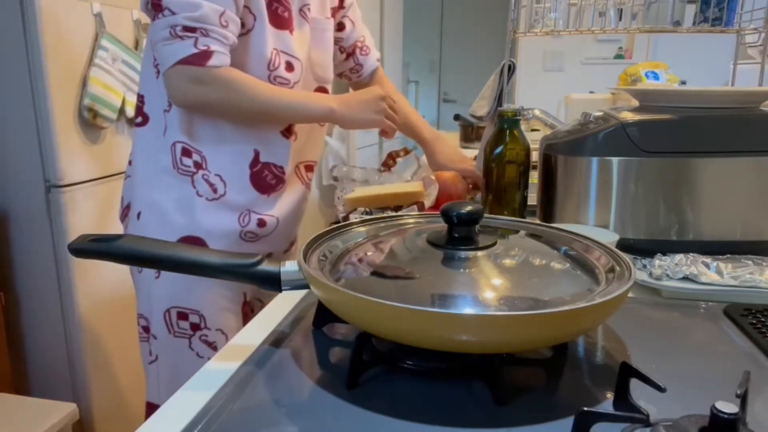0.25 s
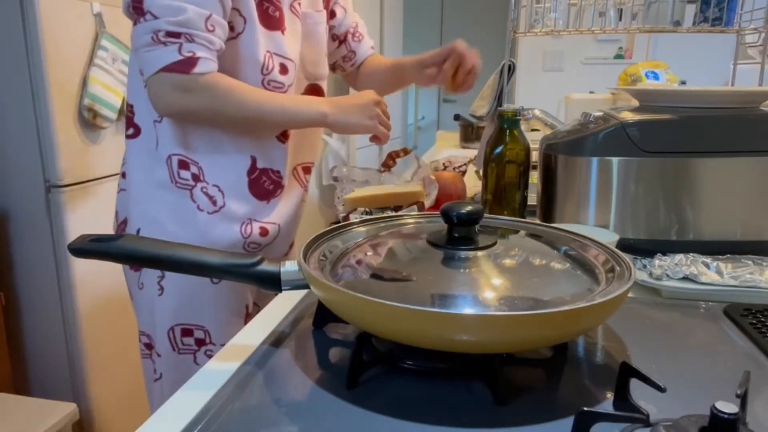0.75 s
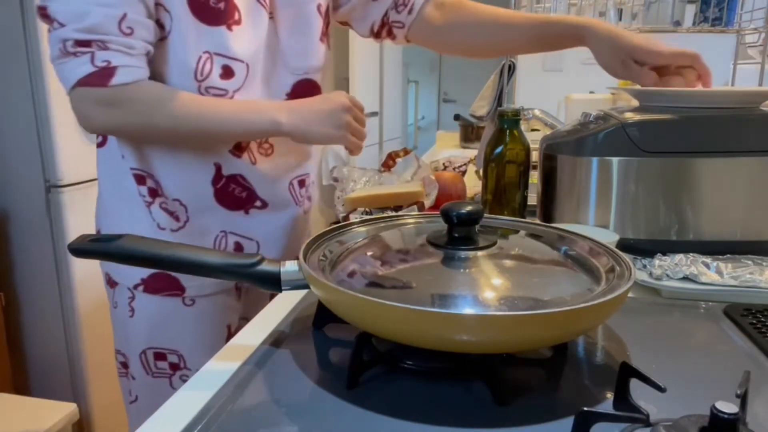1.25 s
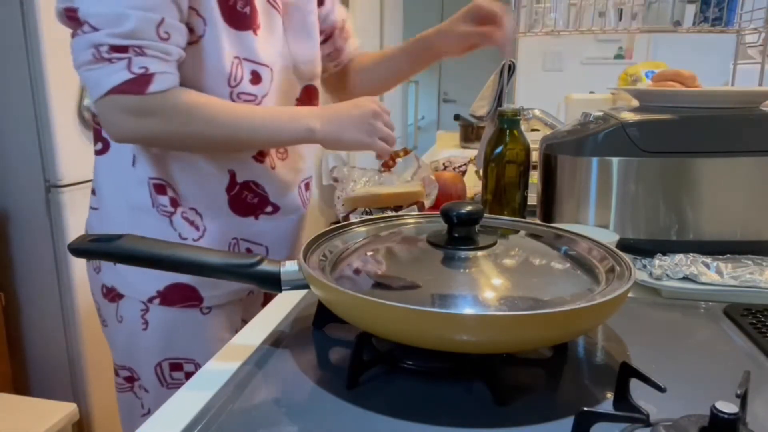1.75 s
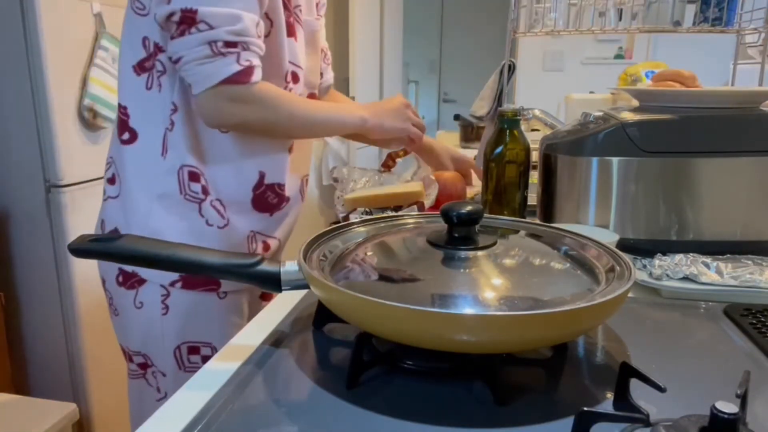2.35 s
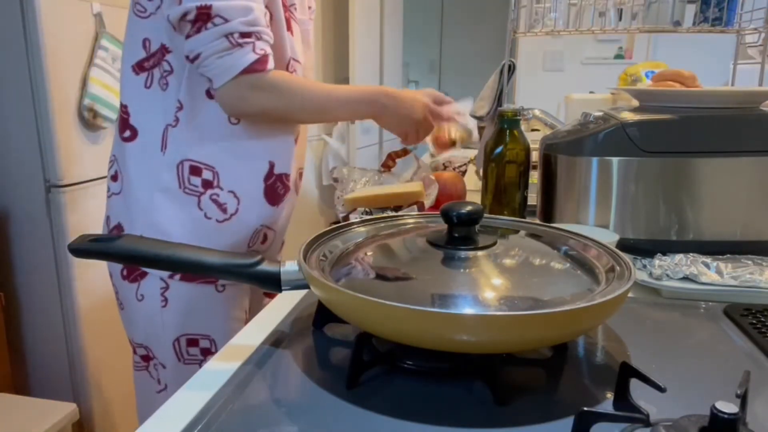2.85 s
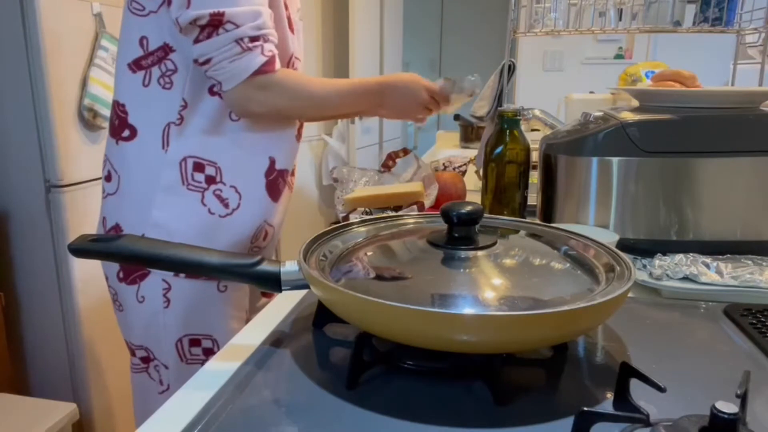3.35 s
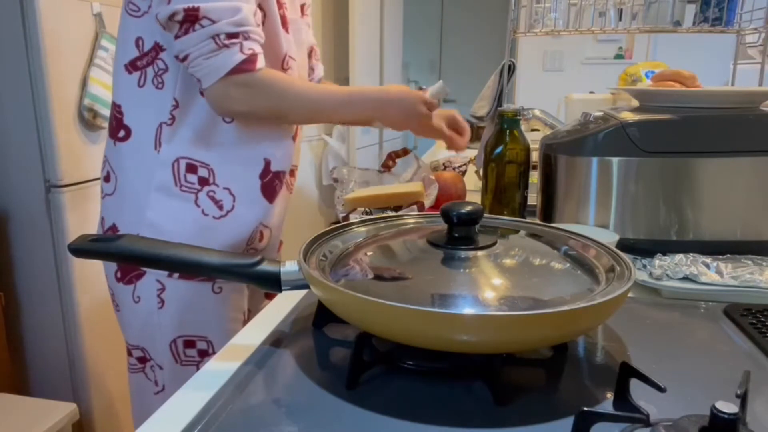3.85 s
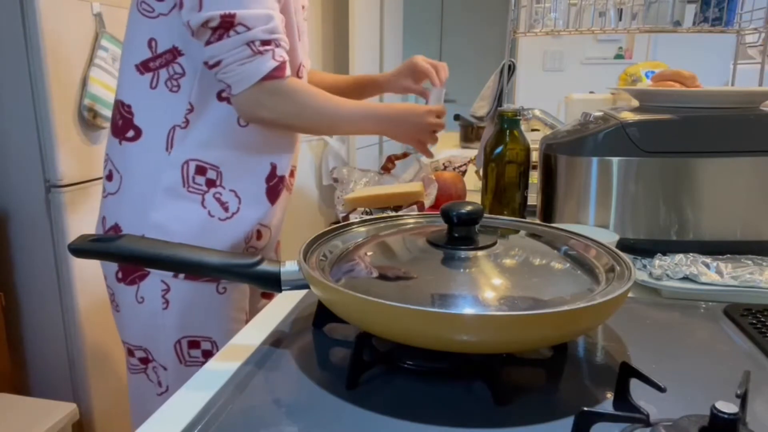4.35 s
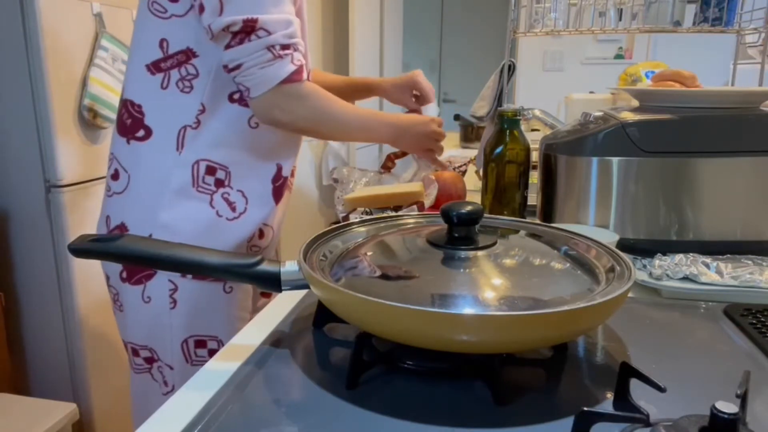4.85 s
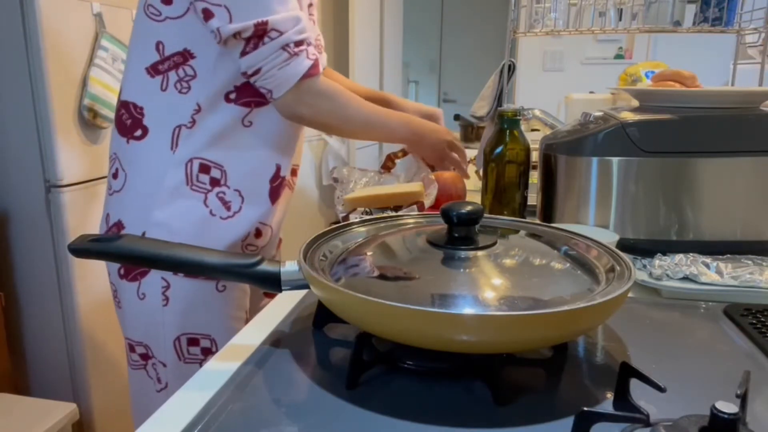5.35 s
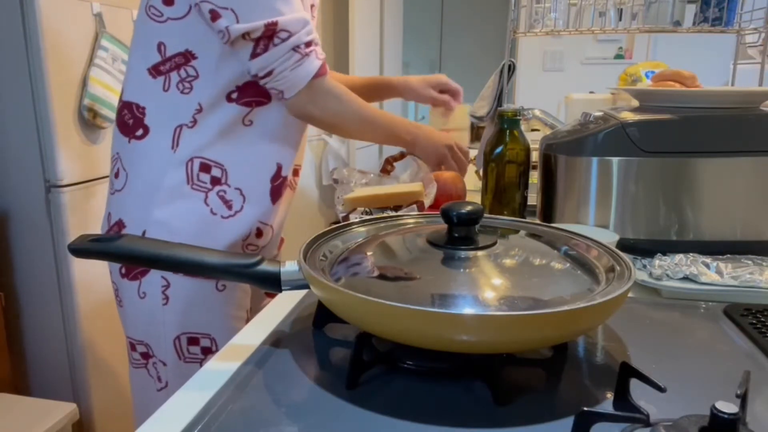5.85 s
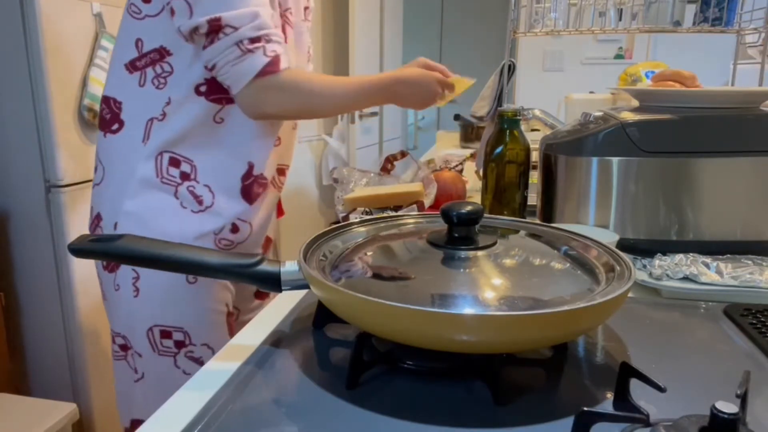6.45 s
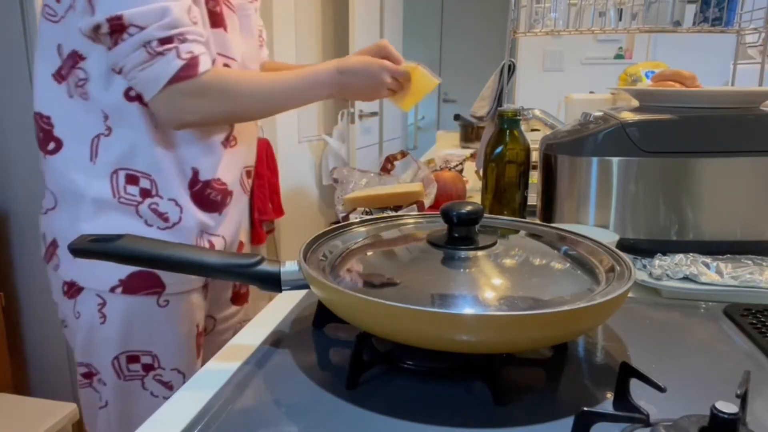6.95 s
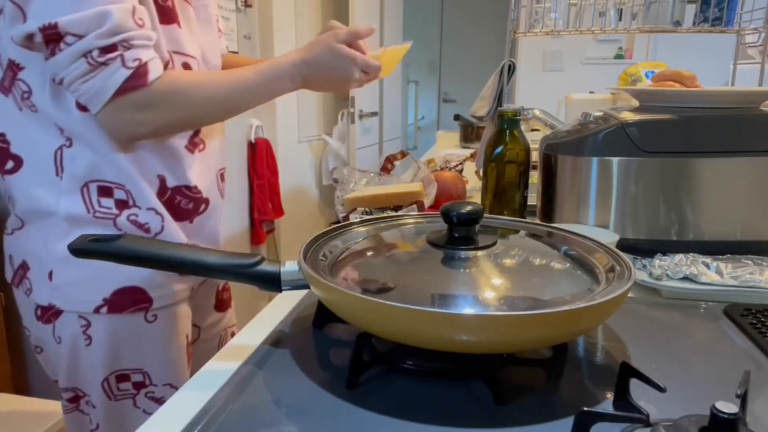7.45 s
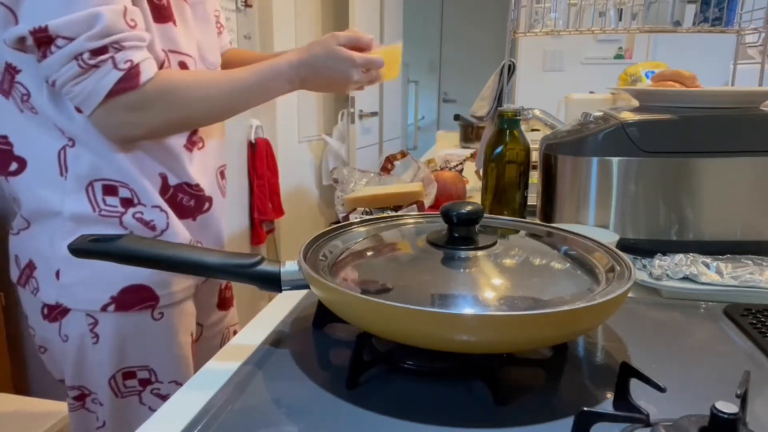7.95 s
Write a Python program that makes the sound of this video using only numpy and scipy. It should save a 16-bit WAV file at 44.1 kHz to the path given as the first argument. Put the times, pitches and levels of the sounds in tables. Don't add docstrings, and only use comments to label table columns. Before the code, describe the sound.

A low extractor hum and thin gas hiss sit behind everything. Fat ticks faintly against a pan lid, then thin plastic packaging crackles brightly at arm's length, densest early on, looser while folded. A low bump follows, then a lull with livelier simmering and one brief crinkle, before a last vigorous peel. Short, dry room reflections; wooden floor groans under shifting weight.

```python
import sys
import numpy as np
from scipy import signal
from scipy.fft import rfft, irfft, next_fast_len
from scipy.io import wavfile
from scipy.ndimage import uniform_filter1d

SR = 44100
rng = np.random.default_rng(int(sys.argv[2]) if len(sys.argv) > 2 else 0)


def nominal_scale(level):
    x = np.asarray(level, float) / 20
    return 10 ** x


def store_wav(level_fs):
    pcm = np.round(np.clip(np.atleast_2d(level_fs), -1, 1) * 32767)
    wavfile.write(sys.argv[1], SR, pcm.T.astype(np.int16))


N = 361619


def rms_one(x):
    return x / np.sqrt(np.mean(x ** 2) + 1e-20)


def at_hz(points, hz):
    points = np.array(points)
    return np.interp(np.log(hz), np.log(points[:, 0]), points[:, 1])


def drift(rate_hz):
    r = np.exp(-2 * np.pi * rate_hz * 40 / SR)
    white = rng.standard_normal(N // 40 + 2002)
    slow = rms_one(signal.lfilter([1], [1, -2 * r, r * r], white)[2000:])
    return np.interp(np.arange(N) / 40, np.arange(len(slow)), slow)


def swell(s, db, rise_s, fall_s):
    t = np.arange(N) / SR - s
    away = np.where(t < 0, -t / rise_s, t / fall_s)
    return nominal_scale(db - 20 * np.minimum(away, 8))


def band(x, low_hz, high_hz):
    edges = [low_hz, min(high_hz, .45 * SR)]
    return signal.sosfilt(signal.butter(2, edges, "band", fs=SR, output="sos"), x)


def resonate(x, hz, width_hz):
    r = np.exp(-np.pi * width_hz / SR)
    poles = [1, -2 * r * np.cos(2 * np.pi * hz / SR), r * r]
    return signal.lfilter(np.array([1, 0, -1]) * (1 - r * r) / 2, poles, x)


def resonate_twice(x, hz, width_hz):
    return resonate(resonate(x, hz, width_hz), hz, width_hz)


# pitch in Hz, left-right likeness (-1 to 1)
LIKENESS = [(50, 1), (130, 0.92), (200, 1), (300, 0.038), (640, -0.79), (1300, 0.75), (2500, 0.75),
            (5000, -0.063)]
# pitch in Hz, left over right in dB
BALANCE = [(50, -1), (130, -3), (300, 3), (600, 8.5), (1200, -0.5)]


def paired(hz):
    mid, side = rng.standard_normal((2, N))
    alike = np.clip(at_hz(LIKENESS, hz), -1, 1)
    lean = nominal_scale(at_hz(BALANCE, hz) / 2 * np.array([[1], [-1]]))
    return lean * (np.sqrt(1 + alike) * mid + np.sqrt(1 - alike) * side * [[1], [-1]]) / np.sqrt(2)


def coloured(source, spectrum, patchy_db, rate_hz):
    low_end, high_end = spectrum[0][0], spectrum[-1][0]
    edges = np.geomspace(low_end, high_end, round(3 * np.log2(high_end / low_end)))
    out = 0
    for low, high in zip(edges, edges[1:]):
        hz = np.sqrt(low * high)
        gain = nominal_scale(at_hz(spectrum, hz) + patchy_db * drift(rate_hz))
        out = out + gain * band(source(hz), low, high)
    return rms_one(out)


def grains(per_s, spread_db, wander=0):
    at = np.flatnonzero(rng.random(N) < per_s / SR)
    size, sign, place = rng.random((3, N // 4))[:, :len(at)]
    clicks = nominal_scale(spread_db * np.minimum(-np.log(size), 3.2)) * np.sign(sign - .5)
    out = np.full((2, N), 1e-18)
    out[0, at] = clicks
    shift = (wander * (2 * place - 1)).astype(int)
    out[1, np.clip(at + shift, 0, N - 1)] = clicks
    return out if wander else out[0]


def add(out, s, sound, pan_db, lag=0):
    start = round(s * SR)
    for side, at in enumerate((start, start + lag)):
        out[side, at:at + len(sound)] += sound[:N - at] * nominal_scale(pan_db * (.5 - side))


FILM_WANDER = 11
# start in seconds, peak in dB, ring in Hz,
# brightness in dB
CREASES = [(2.0572, -34, 2600, -13), (2.123, -40.5, 2250, -16), (2.2214, -35.5, 1010, -28),
           (2.2525, -29, 1710, -31), (2.3093, -31.5, 1850, -44), (2.3465, -33, 2700, -21),
           (2.3535, -16, 2400, -23), (2.3568, -21, 1610, -10), (2.3945, -20.5, 1000, -28),
           (2.4025, -20.5, 1570, -8), (2.4462, -27, 2270, -30), (2.4785, -28, 1220, -30),
           (2.529, -33, 1880, -56), (2.659, -36.5, 2520, -48), (2.732, -21.5, 5850, -1),
           (2.828, -33.5, 1320, -36), (2.8518, -22, 2500, -0.5), (2.8565, -21, 2200, 1),
           (2.967, -27, 2500, -4), (2.9566, -35, 1710, -14), (2.9758, -38, 1180, -9),
           (3.093, -34, 4300, -16), (3.1063, -17, 4200, -10), (3.1125, -30, 4020, -3),
           (3.1368, -20, 5240, -19), (3.1409, -18.5, 5040, -2), (3.225, -34, 4530, 1),
           (3.2345, -24.5, 6000, -7), (3.2448, -18, 4060, 0), (3.2886, -23, 2820, -26),
           (3.2952, -27.5, 1390, -27), (3.299, -22, 2800, -29), (3.3045, -23.5, 3240, -22),
           (3.3735, -26.5, 2970, -16), (3.387, -25.5, 1610, -8), (3.3955, -24, 3900, 4),
           (3.4108, -22.5, 1330, -28), (3.414, -19.5, 3180, -5), (3.424, -29, 3050, -12),
           (3.5685, -33, 2010, -3.5), (3.703, -35, 1970, -51),
           (4.1769, -40.5, 2200, -31), (4.3067, -25.5, 2880, -27), (4.318, -26, 1970, -0.5),
           (4.324, -32.5, 2600, -1), (4.331, -45, 2200, -18), (4.38, -33, 2000, -10),
           (4.42, -36, 2580, -40), (4.626, -30.5, 2600, -6), (4.686, -31.5, 2640, -6),
           (4.715, -35, 3900, -32), (4.6615, -36, 2270, -28), (4.77, -32, 2770, -13),
           (4.7765, -29.5, 2040, -7), (4.818, -24, 2430, -7.5), (4.825, -24.5, 5400, -20),
           (4.9193, -29.5, 1870, -2), (4.995, -43.5, 1090, -37), (5.071, -37.5, 935, -40),
           (5.182, -26.5, 1390, -43), (5.307, -36.5, 1130, -39), (5.53, -32, 3740, -38),
           (5.552, -35.5, 1090, -43), (5.668, -34.5, 1200, -33), (5.7878, -30.5, 1230, 1),
           (5.8057, -28, 1180, -20), (5.826, -40, 1500, -25), (5.869, -35, 1730, -35),
           (5.907, -35.5, 1420, -29), (5.955, -38, 1280, -26), (5.848, -32, 1110, -44),
           (5.8872, -38, 1040, -49), (5.9275, -34.5, 1030, -38),
           (6.133, -43, 5500, 13), (6.356, -44, 1980, -19), (6.81, -44, 6000, 14), (6.845, -46, 6000, 10),
           (7.083, -43, 5500, 8), (7.811, -34.5, 3500, 2), (7.173, -41, 3730, -31), (7.19, -29, 2440, -4),
           (7.208, -22, 2300, 2), (7.7778, -26.5, 1810, 0), (7.786, -27.5, 4330, -3),
           (7.848, -33, 4500, 10), (7.894, -33, 2800, 3), (7.978, -39, 3120, -8), (7.9914, -24, 2930, -4),
           (8.013, -22, 2600, -25), (8.0178, -17, 2100, -3), (8.021, -17.5, 2000, -10.5),
           (8.023, -34, 2200, -6), (8.031, -32, 1900, -20), (8.048, -31, 2400, -30),
           (8.053, -24, 2490, -30), (8.075, -17, 2480, 1), (8.0787, -15, 2380, 3), (8.085, -30, 2600, 7),
           (8.091, -21, 2410, -14), (8.099, -18, 2340, -23), (8.115, -15.5, 2050, -19),
           (8.133, -34, 2780, -18), (8.16, -25, 2200, -18), (8.18, -35, 2200, -9),
           (4.742, -41, 980, -25), (5.191, -30.5, 2170, -23), (5.204, -36, 2600, -25),
          (5.279, -41.5, 1200, -36), (5.467, -39, 1080, -30), (5.655, -40, 1300, -22),
          (5.69, -53, 1300, -20), (5.71, -48, 1500, -18), (5.773, -39.5, 1100, -10),
          (5.878, -37, 1180, -32), (5.94, -52, 1500, -20), (5.975, -43, 2470, -22), (7.792, -33.5, 2200, 2),
          (1.178, -47, 686, -45), (0.428, -41, 3500, -18), (1.268, -50, 3200, -25), (1.523, -47, 3500, -22),
          (2.369, -32, 2800, -15), (2.415, -35, 2200, -20), (2.428, -35, 3430, -20),
          (2.328, -35.5, 1040, -40), (2.468, -39, 1050, -37), (2.733, -35.5, 1190, -28),
          (3.109, -38, 1800, -25), (3.2, -56, 1350, -35), (3.584, -35, 6500, -9), (3.645, -50, 1100, -35),
          (3.741, -41.5, 2960, -18), (3.942, -57.5, 3300, -40), (3.997, -40, 4470, -42),
          (4.109, -49.5, 5000, -14), (4.165, -42, 7000, -8), (4.3088, -33.5, 1070, -35),
          (4.651, -39, 2300, -25), (4.716, -39.5, 1150, -35), (4.781, -27, 6030, -10),
          (4.918, -40.5, 1170, -30), (7.986, -40.5, 1020, -40), (8.079, -39, 535, -50),
          (8.114, -31, 530, -50), (8.176, -33, 1000, -40)]


def snaps():
    out, t = np.zeros((2, N)), np.arange(2600) / SR
    rows = CREASES
    fade = np.minimum(t / 0.0005, 1) * (np.exp(-t / 0.0018) + 0.25 * np.exp(-t / 0.008))
    for (s, db, hz, bright_db), (noise, dice) in zip(rows, rng.standard_normal((len(rows), 2, 2600))):
        rattle = noise * nominal_scale(4.36 * dice) * fade
        clatter = 0.91 * rms_one(band(rattle, 0.62 * hz, 2.4 * hz))
        ring = 4.7 * rms_one(resonate(resonate(rattle, hz, 0.3 * hz), hz, 1.14 * hz))
        front = nominal_scale(1.11 * (bright_db + 18.5)) * rms_one(band(rattle, 2630, 13600))
        sound = clatter + ring + front
        pan_db = 6.5 * np.tanh(dice[-1]) - 0.5
        lag = int(FILM_WANDER * np.tanh(dice[-2]))
        add(out, s, nominal_scale(db + 1.5) * sound / np.abs(sound).max(), pan_db, lag)
    return out


# peak time in seconds, peak in dB, fall in seconds, brightness in dB, low body in dB
TUGS = [(2.06, -34, 0.026, 0.5, -11), (2.358, -35, 0.11, -2, -10), (2.971, -32.5, 0.055, -6, -8),
        (3.109, -35.5, 0.16, -11, -9.5), (3.377, -28, 0.097, -6, -12), (4.178, -46.5, 0.19, -16, -10),
        (4.315, -41.5, 0.23, -11, -3.5), (4.632, -38.5, 0.022, -26, -9.5), (4.825, -37.5, 0.016, 1, -19),
        (5.18, -49, 0.14, -40, -28), (5.8, -48, 0.51, -30, -8), (6.791, -53.5, 0.13, 4.5, -9),
        (7.344, -62, 0.18, -16, -16), (7.417, -55, 0.13, -4, 0), (7.77, -59, 0.22, 13.5, -1),
        (8.017, -28.5, 0.088, -3, -21), (8.075, -32, 0.072, 3, -5.5), (8.15, -39, 0.26, 2, 2.5)]
# peak time in seconds, peak in dB, rise in seconds, fall in seconds, brightness in dB
SQUEEZES = [(2.3, -47, 0.46, 0.33, -31), (2.411, -34.5, 0.11, 0.12, -8.5), (2.694, -52, 0.3, 0.064, -37),
            (2.852, -46, 0.068, 0.4, -10), (3.302, -28, 0.073, 0.046, -4.5), (3.411, -30, 0.1, 0.047, -7.5),
            (3.77, -62, 0.22, 0.059, -26), (4.1, -58, 0.033, 0.036, -9), (4.48, -64, 0.32, 0.053, -27),
            (4.72, -45.5, 0.1, 0.37, -26), (5.05, -47.5, 0.069, 0.063, -21),
            (5.71, -51.5, 0.53, 0.05, -1.5), (5.95, -46, 0.42, 0.022, -32), (7.207, -45.5, 0.021, 0.11, 3),
            (7.95, -60, 0.91, .1, -12), (8.12, -33, 0.17, 0.23, 1)]
# pitch in Hz, density in dB per Hz
FILM_COLOUR = [(700, -14), (1100, 0), (1700, 0.5), (2600, 5), (4000, 0), (6500, -4), (8500, -6)]


def crumple():
    tug_rise_s, squeeze_body_db = 0.0069, -7
    moves = [(s, db, tug_rise_s, *rest) for s, db, *rest in TUGS]
    moves += [(*row, squeeze_body_db) for row in SQUEEZES]
    power = uniform_filter1d([swell(*move[:4]) ** 2 for move in moves], size=300)
    bright_db, body_db = np.transpose(moves)[4:]
    level = np.sqrt(power.sum(axis=0))
    bright = np.sqrt(nominal_scale(2 * bright_db) @ power)
    low = np.sqrt(nominal_scale(2 * body_db) @ power)

    clumps = nominal_scale(5.5 * drift(70.0))
    clicks = rms_one(grains(1800 * clumps, 4.0, FILM_WANDER))

    def creases(hz):
        return clicks + 0.53 * rms_one(grains(450.0 * clumps, 7.2, FILM_WANDER))

    mid = coloured(creases, FILM_COLOUR, patchy_db=2.5, rate_hz=24)
    top = nominal_scale(-1.0) * rms_one(band(clicks, 3500, 11900))
    body = nominal_scale(-5.0) * rms_one(band(band(clicks, 206, 900), 250, 1130))
    return level * mid + bright * top + low * body


# start in seconds, peak in dB, ring in Hz, left over right in dB
SPITS = [(0.082, -58, 3060, 5), (0.192, -53.5, 5610, 0), (0.604, -59, 3730, 0), (0.696, -60, 1140, 2),
         (0.997, -64, 2420, 0), (1.165, -52, 2150, -5), (1.23, -56, 4570, 5), (1.321, -52, 6200, 2),
         (1.3316, -49.5, 1040, -1), (1.362, -52, 4630, 0), (1.888, -59, 1540, 0), (1.908, -59, 1820, -6),
         (2.002, -58, 3100, -6), (0.134, -54.5, 870, 11), (0.313, -49.5, 880, 2), (0.414, -51, 2520, 1),
         (0.513, -49, 905, 1.5), (0.56, -49.5, 1930, 1), (0.639, -45, 5330, 0), (0.745, -52, 990, 5),
         (0.88, -55, 1120, 1), (1.055, -49.5, 4560, 2), (1.256, -50, 1870, -2), (1.34, -48, 1840, 2),
         (1.371, -41, 2610, 2.0), (1.402, -42.5, 2170, 2), (1.418, -45, 2240, -3), (1.513, -61, 2770, 12),
         (1.59, -52.5, 3750, 3), (1.624, -49, 1040, 0), (1.959, -45.5, 5400, 2), (3.788, -38, 1570, 1),
         (3.838, -43.5, 3340, 3), (3.982, -49, 4700, 2), (3.983, -53, 3150, 0), (3.799, -44, 1550, 0),
         (3.703, -47, 1790, 3), (7.584, -60, 900, 0), (5.033, -37.5, 806, 0), (6.1, -45, 1840, -4),
         (6.313, -51, 1720, 2), (6.354, -55.5, 880, -3), (6.416, -48, 2440, -1), (6.523, -44.5, 1030, -3),
         (7.339, -45.5, 6000, -4), (7.649, -55, 1400, 13)]


def spits():
    out, t = np.zeros((2, N)), np.arange(2000) / SR
    for (s, db, hz, pan_db), noise in zip(SPITS, rng.standard_normal((len(SPITS), 2000))):
        burst = noise * np.exp(-t / .006)
        ring = rms_one(resonate_twice(burst, hz, 100 + .09 * hz))
        click = .35 * rms_one(band(burst * np.exp(-t / .002), .7 * hz, 1.9 * hz))
        sound = ring + click
        add(out, s, nominal_scale(db + 4.0) * sound / np.abs(sound).max(), pan_db)
    return out


# time in seconds, level in dB
SIZZLE = [
    (0.0, -64.5),
    (1.5, -62),
    (1.9, -72.5),
    (4.0, -92),
    (6.2, -60.5),
    (7.2, -65),
    (8.2, -80),
]
# peak time in seconds, level in dB, rise in seconds, fall in seconds
BUSY = [
    (1.334, -53, 0.021, 0.06),
    (2.33, -54.5, 0.6, 0.75),
    (3.33, -50.5, 0.82, 0.5),
    (4.32, -74, 0.54, 0.51),
    (4.82, -55.5, 0.21, 1),
    (5.64, -56.5, 13, 0.47),
    (8.2, -52, 0.076, .1),
]
# pitch in Hz, density in dB per Hz
SIZZLE_COLOUR = [(600, -2), (1100, 0), (1500, -3), (2400, -1.5), (3500, -6), (5500, -8.5), (7500, -6),
                 (11000, -17), (16000, -34)]


def sizzle():
    s, db = np.transpose(SIZZLE)
    level_db = uniform_filter1d(np.interp(np.arange(N) / SR, s, db), size=300)
    level = np.sqrt(nominal_scale(2 * level_db) + sum(swell(*row) ** 2 for row in BUSY))
    fizz = coloured(lambda hz: grains(600.0, 7.3), SIZZLE_COLOUR, patchy_db=2.4, rate_hz=13.7)
    return level * nominal_scale(-0.5 + .9 * drift(8.0)) * fizz


# pitch in Hz, width in Hz, level in dB
PAN_RINGS = [(885, 17, -72.5), (1140, 190, -70), (1847, 28, -79), (3140, 84, -75)]


def pan_rings():
    return sum(nominal_scale(db + 3.2 * drift(2.5)) * rms_one(resonate(paired(hz), hz, width_hz))
               for hz, width_hz, db in PAN_RINGS)


# pitch in Hz, density in dB per Hz
FLAME_COLOUR = [(600, -24), (1300, -9), (2500, -17), (4200, 9.5), (5200, 2), (7500, -4), (11000, -1.5),
                (16000, -7)]


def flame():
    jet = paired(5000)
    return nominal_scale(-71.5) * coloured(lambda hz: jet, FLAME_COLOUR, patchy_db=4.0, rate_hz=11.6)


# peak time in seconds, level in dB, length in seconds, pitch in Hz
GROANS = [(1.044, -38.5, 0.05, 126), (1.194, -38.5, 0.065, 136), (1.247, -43, 0.04, 118),
          (1.419, -53, 0.21, 219.6), (1.599, -49.5, 0.18, 217.3), (2.352, -47.5, 0.12, 233),
          (2.52, -58, 0.26, 217), (7.677, -54, 0.16, 302), (7.818, -53, 0.11, 320),
          (7.941, -49.5, 0.035, 318), (8.053, -51, 0.065, 303), (0.61, -44, 0.11, 95.5),
          (1.699, -47, 0.075, 99), (2.42, -46.5, 0.024, 320), (8.18, -42, 0.047, 269),
          (8.082, -41, 0.029, 533), (8.116, -43.5, 0.032, 524)]


def groans():
    out, sag_per_s = 0, 0.4
    for s, db, length_s, hz in GROANS:
        t = np.arange(N) / SR - s
        turns = 2 * np.pi * hz * t * (1 - sag_per_s * t / 2)
        tone = np.sin(turns) + nominal_scale(-21.5) * np.sin(2 * turns)
        out = out + np.sqrt(2) * swell(s, db, length_s, length_s) * tone
    return out * nominal_scale([[-1.2], [1.2]])


# peak time in seconds, rumble in dB, rise in seconds, fall in seconds
THUDS = [
    (1.179, -38, 0.04, 0.041),
    (2.398, -48, 0.14, 0.23),
    (5.842, -45, 0.082, 0.088),
    (5.924, -37.5, 0.17, 0.15),
    (8.2, -66, 0.073, .1),
]
# pitch in Hz, density in dB per Hz
THUD_COLOUR = [(45, -6), (65, 0), (125, -1), (200, -9), (330, -14), (600, -27), (900, -34), (1500, -50)]


def thuds():
    level = np.sqrt(sum(swell(*row) ** 2 for row in THUDS))
    return level * coloured(paired, THUD_COLOUR, patchy_db=4.0, rate_hz=94)


# pitch in Hz, width in Hz, level in dB
MOTOR = [(45, 14, -56), (94.7, 6.9, -58), (129.4, 22.4, -60), (200, 12.8, -65.5), (242.3, 2, -66.5),
         (299.3, 4.4, -64.5), (491, 14, -72)]
# pitch in Hz, density in dB per Hz
FAN_AIR = [(18, 10), (30, -19), (54, 5), (70, -3.5), (102, 1.5), (137, -8), (157, -19.5), (244, -4),
           (367, -13), (754, -27.5), (1030, -29), (1500, -40), (1950, -55), (3300, -120)]


def fan():
    shaft_hz = 47.9 + 0.21 * drift(0.99)
    shaft = np.sqrt(2) * nominal_scale(-55) * np.sin(2 * np.pi * np.cumsum(shaft_hz) / SR)
    orders = sum(nominal_scale(db) * rms_one(resonate_twice(paired(hz), hz, 2 * width_hz)) for hz, width_hz, db in MOTOR)
    air = nominal_scale(-53.5) * coloured(paired, FAN_AIR, patchy_db=2.5, rate_hz=3.84)
    return shaft * nominal_scale([[-.6], [.6]]) + orders + air


def kitchen(x, wet_db, lag=31):
    t60_s, wall_cut_hz = 0.11, 6700
    t = np.arange(SR // 2) / SR
    dull = np.exp(-2 * np.pi * wall_cut_hz / SR)
    white = rng.standard_normal((2, len(t)))
    fade = nominal_scale(-60 * t / t60_s) * np.clip(t / 0.0042, 0, 1)
    early_highs = 0.27 * white * nominal_scale(-60 * t / 0.0077)
    tail = fade * (signal.lfilter([1 - dull], [1, -dull], white) + early_highs)
    tail = nominal_scale(wet_db) * tail / np.sqrt(np.sum(tail ** 2, axis=1, keepdims=True))
    tail[[1, 0], [0, lag]] = 1
    size = next_fast_len(N + len(t))
    wet = irfft(rfft(x * np.ones((2, 1)), size) * rfft(tail, size), size)[:, :N]
    return wet / np.sqrt(1 + nominal_scale(2 * wet_db))


def scene():
    film = kitchen(snaps(), -6, lag=0) + kitchen(crumple(), -4, lag=0)
    pan = kitchen(spits(), -6) + kitchen(sizzle(), 5)
    return film + pan + pan_rings() + flame() + groans() + thuds() + fan()


# pitch in Hz, threshold below which a chance of spread 1 mutes the strip
BLINKS = [(3500, -3), (4800, -1.2), (6500, -1.1), (7400, -.5), (7700, .6), (8800, .6), (9100, -1.2),
          (11300, -1.3), (13800, 0), (14600, -.6), (15600, .4)]


def blink(x):
    hz, t, cells = signal.stft(x, SR, nperseg=1024)
    dice = rng.standard_normal((len(hz) // 4 + 1, len(t)))
    dice = uniform_filter1d(dice, size=5) * np.sqrt(5)
    kept = np.repeat(dice, 4, axis=0)[:len(hz)] > at_hz(BLINKS, hz + 1)[:, None]
    return signal.istft(cells * (.03 + .97 * kept), SR, nperseg=1024)[1][:N]


def top_cut(x):
    return signal.sosfilt(signal.butter(12, 16630, fs=SR, output="sos"), x)


# pitch in Hz, sum in dB,
# difference in dB
SUM_DIFFERENCE = [(7400, 0, 0), (7600, -4, 2), (8900, -4, 2), (9050, 1, 0), (9500, 2, -3), (9700, 3, -18),
                  (11100, 3, -18), (11700, 0, 0), (11850, -12, 2), (13700, -12, 2), (13800, 5, -6), (14300, 6, -20),
                  (15500, 6, -22), (15850, -34, -40), (16600, -40, -46)]


def record(dry):
    left, right = signal.sosfilt(signal.butter(4, 38, "high", fs=SR, output="sos"), dry)
    size = next_fast_len(N)
    hz = np.arange(size // 2 + 1) * SR / size
    port_hz, sum_db, difference_db = np.transpose(SUM_DIFFERENCE)
    mid = irfft(rfft(left + right, size) * nominal_scale(np.interp(hz, port_hz, sum_db)), size)[:N] / 2
    side = irfft(rfft(left - right, size) * nominal_scale(np.interp(hz, port_hz, difference_db)), size)[:N] / 2
    mid = blink(mid)
    return top_cut(np.array([mid + side, mid - side]))


dry = scene()
out = record(dry)
store_wav(out)
```